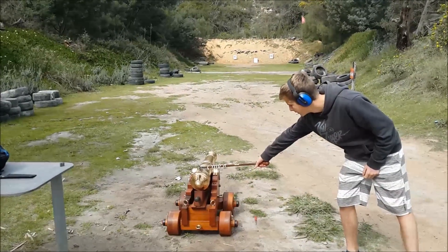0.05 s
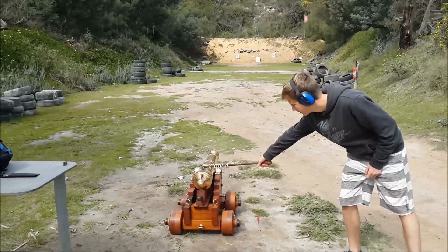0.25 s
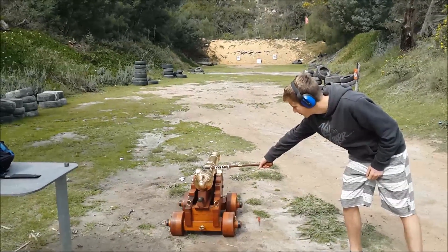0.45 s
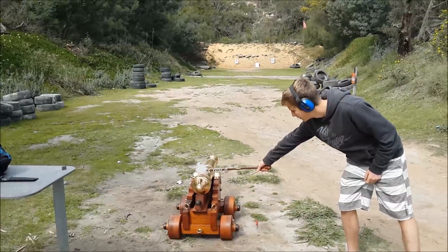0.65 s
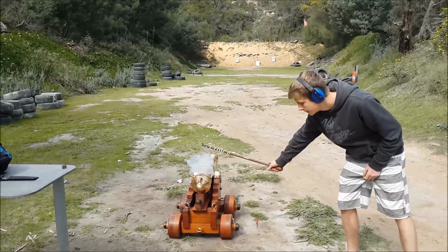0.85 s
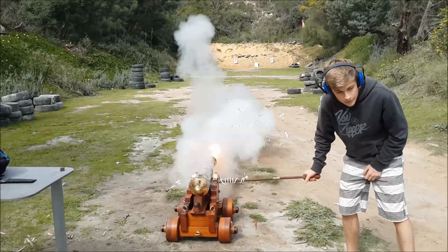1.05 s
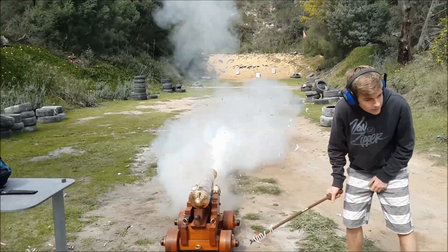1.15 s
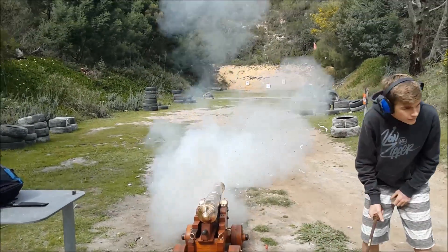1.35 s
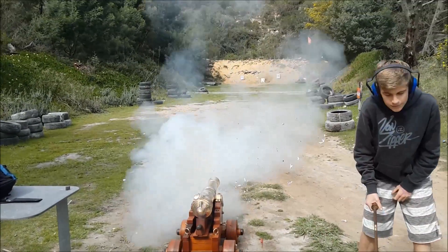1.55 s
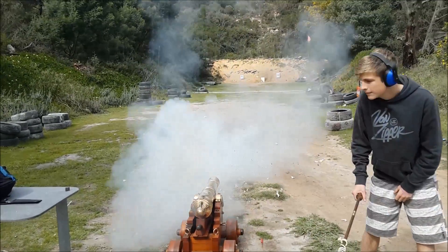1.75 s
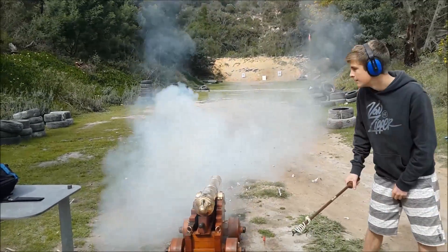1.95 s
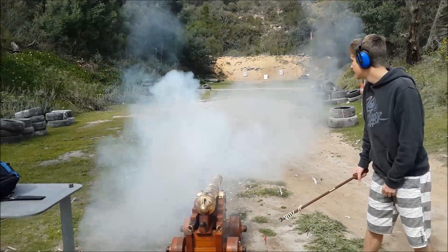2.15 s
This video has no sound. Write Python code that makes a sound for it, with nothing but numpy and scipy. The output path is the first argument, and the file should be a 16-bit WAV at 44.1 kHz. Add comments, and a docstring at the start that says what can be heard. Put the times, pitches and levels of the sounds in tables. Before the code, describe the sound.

A small cannon fires one sharp, overloading blast after a brief fuse hiss, echoing outdoors.

```python
"""Light wind and a faint, distant drone come first. Then a small black powder cannon fires on an
outdoor range: the priming powder fizzes, gas jets from the touch hole (the small hole that leads
to the charge), and the charge goes off with a crack and a roar that overload the microphone.
Earth banks and trees roll the sound back until it passes the far end of the range.
A few bits of debris tick down."""
import sys
import numpy as np
from scipy import signal
from scipy.fft import rfft, irfft, next_fast_len
from scipy.io import wavfile
from scipy.ndimage import map_coordinates

SR = 44100
rng = np.random.default_rng(int(sys.argv[2]) if len(sys.argv) > 2 else 0)


def wav_record(signal):
    """Record a signal, one row per channel, as 16-bit PCM in the file named by sys.argv[1]."""
    frames = np.transpose(np.atleast_2d(signal))
    bounded = np.clip(frames, -1, 1)
    # unit amplitude maps onto the largest positive 16-bit level
    quanta = np.round(bounded * 32767).astype(np.int16)
    wavfile.write(sys.argv[1], SR, quanta)


N = 96182

FIRE_S, BLAST_RISE_S = 1.2452, 0.0013  # when the charge fires, and how long the blast takes to rise

# The tone of each noise, from bass to treble (frequency [Hz], relative level [dB])
BLAST_TONE = [(30, -27), (100, -1), (300, -0.5), (1300, 2.5), (2000, 1), (2900, -1.5), (4500, 0.5),
              (6000, 0), (9000, -4.5), (14000, -8)]  # roar from the muzzle
CRACK_TONE = [(100, -19), (1000, -9.5), (2800, -10), (4300, 2), (6200, -0.5), (8000, -12.5), (14000, -18.5)]  # shock front
SLAP_TONE = [(60, -13), (200, 2), (600, 7), (1500, -5.5), (3000, -20.5), (12000, -38)]  # hard echo off one bank
FIZZ_TONE = [(300, -7), (900, -11), (1700, 0), (3100, -9), (4300, -1), (6000, 0.5), (8000, -7),
             (10000, -14), (13500, -10)]  # burning priming powder
FLARE_TONE = [(300, -7.5), (900, 2), (1700, 10.5), (2900, -5.5), (5000, -6.5), (8000, 2), (9500, -4.5),
              (14000, -5.5)]  # its brighter flare
JET_TONE = [(30, -11.5), (70, -9), (230, -14.5), (460, -14), (750, -5), (1500, -4), (3100, -6.5),
            (4300, -1.5), (6000, 0.5), (9000, -9), (14000, -10)]  # gas from the touch hole
NEAR_ECHO_TONE = [(30, -34.5), (60, -24.5), (90, -10), (125, 0), (185, -0.5), (240, -7), (310, -2.5),
                  (400, -9.5), (520, -5), (800, -17), (1400, -20.5), (3000, -47), (9000, -62.5)]  # near banks
FAR_ECHO_TONE = [(30, -34), (55, -22), (85, -2.5), (130, 3), (165, -4.5), (200, 1), (245, -7.5),
                 (290, -2.5), (350, -9), (420, -2), (580, -6.5), (700, -10.5), (1300, -10), (2400, -21.5),
                 (4000, -30), (10000, -66)]  # far banks
SCATTER_TONE = [(30, -30.5), (80, 2), (200, 6.5), (500, -5.5), (1300, 0.5), (2900, -4.5), (4300, -1.5),
                (5200, -2), (5950, 2.5), (6700, -2), (8000, -6.5), (10000, -13), (14000, -60)]  # echoes from scrub and trees
AIR_TONE = [(15, -59), (25, -36), (54, -3), (111, -2.5), (134, -9), (228, -6.5), (297, -14), (443, -8.5),
            (480, -18.5), (520, -11), (735, -15), (1250, -14), (3730, -27), (6880, -23.5), (14500, -41)]  # light wind
PUFF_TONE = [(30, -18), (70, 2.5), (115, 3.5), (190, -7), (320, -27), (1000, -48)]  # puffs of wind

# How long the blast takes to fade by 60 dB (frequency [Hz], time [s])
BLAST_FADE = [(100, 0.53), (1000, 0.58), (3000, 0.47), (6000, 0.68), (10500, 0.49), (14000, .24)]

# How alike the two sides sound (frequency [Hz], likeness [1 = the same, 0 = unrelated])
CLOSE_LIKENESS = [(60, 0.41), (250, 0.47), (700, 0.43), (1500, 0.058), (14000, 0)]  # the cannon itself
ECHO_LIKENESS = [(60, 0.95), (130, 0.99), (300, 0.98), (640, 0.98), (1200, -0.014), (3000, -0.012),
                 (14000, -0.077)]  # echoes and puffs of wind
AIR_LIKENESS = [(60, 0.69), (240, 0.95), (940, 0.11), (3730, 0.0), (14800, 0.02)]  # light wind

# How far a sound leans to the left (frequency [Hz], left minus right [dB])
BLAST_BALANCE = [(100, 6), (2300, 0), (4400, 2.5), (8000, 4.5), (14000, -2)]
SCATTER_BALANCE = [(400, -3.5), (1300, 6), (2400, -1), (4400, 2), (8000, 4)]
MIC_BALANCE = [(100, 1), (700, -.5), (1300, 0.5), (2400, 1.5), (4350, 0.5), (5800, 6.5), (7600, -12.5),
               (10000, -6.5), (14000, -4.5)]  # the microphone's two openings

# Echoes from the earth banks (time [s], level [dB], rise [s], fall [s])
BANK_ECHOES = [(1.28, -11, 0.0036, 0.012), (1.333, -7.5, 0.022, 0.021), (1.361, -15.5, .004, 0.023),
               (1.447, -16.5, 0.009, 0.013), (1.493, -22, 0.024, 0.016), (1.55, -22.5, 0.017, 0.048),
               (1.639, -24, 0.0116, 0.068), (1.734, -34, 0.023, 0.048), (1.815, -30, 0.038, 0.11),
               (1.938, -40.5, 0.012, 0.01)]
# Bits of debris landing (time [s], level [dB], pitch [Hz], time to fade by 60 dB [s])
DEBRIS_TICKS = [(1.5429, -25.5, 2600, 0.029), (1.8306, -25, 6100, 0.019), (1.8401, -29.5, 6560, 0.014),
                (2.0428, -50, 2350, 0.032)]
# Soft puffs of wind (time [s], level [dB], half length [s])
WIND_PUFFS = [(0.36, -53, 0.0095), (0.675, -46, 0.017), (.765, -50, 0.0099), (0.947, -49, 0.015),
              (0.985, -40.5, 0.007)]
# How loud the background is as time passes (time [s], level [dB])
AIR_LOUDNESS = [(0, -53), (.2, -53.5), (.35, -54), (.52, -55.5), (.65, -53.5), (1.1, -52), (2.18, -58)]
DRONE_LOUDNESS = [(0, -73), (.15, -58), (.3, -81), (.55, -66.5), (.75, -58), (.98, -68), (1.15, -58.5),
                  (2.18, -78.5)]


def blast(level_db=-1.5, hold_s=0.016, ragged_db=2.0):
    """The muzzle blast starts at once, holds briefly, and each frequency dies at its own speed."""
    roar = filtered(noise(BLAST_TONE, CLOSE_LIKENESS), lambda hz: pan(along(BLAST_BALANCE, hz)))
    hz, times, spectrum = signal.stft(roar, SR, nperseg=512)
    age = np.maximum(times - FIRE_S - hold_s, 0)
    fade = np.exp(-np.log(1000) * age / along(BLAST_FADE, hz)[:, None])
    roar = signal.istft(spectrum * fade, SR)[1][:, :N]
    onset = np.clip((clock() - FIRE_S) / BLAST_RISE_S + .5, 0, 1)
    return roar * onset * amp(level_db + ragged_db * wobble(250))


def shock(crack_db=3, slap_db=-9, slap_s=1.3585):
    """The bright crack at the front of the blast, and its duller slap off a near bank."""
    crack = amp(crack_db) * swell(FIRE_S + BLAST_RISE_S, rise_s=0.00028, fall_s=0.0093)
    slap = amp(slap_db) * swell(slap_s, rise_s=0.00066, fall_s=0.003)
    return crack * noise(CRACK_TONE, CLOSE_LIKENESS) + slap * noise(SLAP_TONE, ECHO_LIKENESS)


def priming(start_s=0.697, fade_db_per_s=14, full_jet_s=1.2368, jet_db_per_s=713.5, sputter_db=0.2):
    """Powder in the touch hole catches, fizzes and flares, then jets harder until the charge fires."""
    t = clock()
    age = t - start_s
    burn = np.clip(age / .13, 0, 1) * amp(-53 - fade_db_per_s * age)
    catch = amp(-58) * swell(peak_s=0.758, rise_s=0.045, fall_s=.04)
    flare = amp(-55) * swell(peak_s=0.99, rise_s=0.18, fall_s=0.14)
    jet = amp(-15 + jet_db_per_s * np.minimum(t - full_jet_s, 0))
    gas = (burn + catch) * noise(FIZZ_TONE, CLOSE_LIKENESS)
    gas += flare * noise(FLARE_TONE, CLOSE_LIKENESS)
    gas += jet * noise(JET_TONE, CLOSE_LIKENESS)
    return gas * amp(sputter_db * wobble(300)) * (t < FIRE_S + BLAST_RISE_S)


def ground_bounce(sound, count=8, latest_s=.009, strength=0.15):
    """The ground and the cannon's carriage add weak, quick copies, different at each ear."""
    delays = latest_s * rng.uniform(0.1005, 1, (count, 2, 1))
    copies = lambda hz: 1 + strength * np.exp(-2j * np.pi * hz * delays).sum(0)
    return filtered(sound, copies) / np.sqrt(1 + count * strength ** 2)


def bank_echoes(near_count=3):
    """The near banks answer first with a boom, the far ones later with a rolling rumble."""
    swells = np.array([amp(db) * swell(s, rise, fall) for s, db, rise, fall in BANK_ECHOES])
    boom = swells[:near_count].sum(0) * noise(NEAR_ECHO_TONE, ECHO_LIKENESS)
    rumble = swells[near_count:].sum(0) * noise(FAR_ECHO_TONE, ECHO_LIKENESS)
    return boom + rumble


def tree_scatter(fade_db_per_s=25, far_end_s=1.905, extra_fade_db_per_s=59.5, build_s=.2, grain_db=1.0):
    """Countless tiny echoes from scrub and trees, fading faster once the far end has answered."""
    t = clock()
    level_db = -20 - fade_db_per_s * (t - FIRE_S) - extra_fade_db_per_s * np.maximum(t - far_end_s, 0)
    leaves = filtered(noise(SCATTER_TONE, ECHO_LIKENESS), lambda hz: pan(along(SCATTER_BALANCE, hz)))
    hz, times, spectrum = signal.stft(leaves, SR, nperseg=512)
    # Later echoes have crossed more air, so they are duller: 8 dB a second at 7000 Hz.
    loss_db = 8 * np.maximum(times - FIRE_S, 0) * (hz[:, None] / 7000) ** 2
    leaves = signal.istft(spectrum * amp(-loss_db), SR)[1][:, :N]
    onset = np.clip((t - FIRE_S) / build_s, 0, 1)
    return leaves * onset * amp(level_db + grain_db * wobble(220))


def debris(sharpness=2, left_db=3):
    """Falling bits land with short, dry ticks, each a broad band of noise around one pitch."""
    ticks = np.zeros((2, N))
    for time_s, db, pitch, fade_s in DEBRIS_TICKS:
        band = lambda hz: (1 + (2 * sharpness * (hz / pitch - 1)) ** 2) ** -2
        tick = unit_level(filtered(rng.standard_normal((2, N)), band))
        ticks += tick * amp(db) * swell(time_s, rise_s=0.00032, fall_s=fade_s / np.log(1000))
    return ticks * pan(left_db)


def wind():
    """Moving air makes a quiet rush with a few soft, low puffs."""
    air = loudness(AIR_LOUDNESS) * noise(AIR_TONE, AIR_LIKENESS)
    puffs = sum(amp(db) * np.exp(-((clock() - s) / half) ** 2) for s, db, half in WIND_PUFFS)
    return air + puffs * noise(PUFF_TONE, ECHO_LIKENESS)


def drone(pitch_hz=439, waver_rad=0.95):
    """A faint, distant tone that wavers in pitch as it comes and goes."""
    phase = 2 * np.pi * pitch_hz * clock() + waver_rad * wobble(17)
    return loudness(DRONE_LOUDNESS) * unit_level(np.sin(phase))


def noise(tone, likeness):
    """Stereo noise of average strength 1, with a given tone and likeness between the sides."""
    def shape(hz):
        width = np.arccos(np.clip(along(likeness, hz), -1, 1)) / 2
        return amp(along(tone, hz)) * [np.cos(width), np.sin(width)]
    mid, side = filtered(rng.standard_normal((2, N)), shape)
    return unit_level(np.array([mid + side, mid - side]))


def swell(peak_s, rise_s, fall_s):
    """A rounded rise to a peak, then a fall to about a third every fall_s."""
    age = clock() - peak_s
    return np.exp(-(np.minimum(age, 0) / rise_s) ** 2 - np.maximum(age, 0) / fall_s)


def wobble(rate):
    """A smooth curve through `rate` random points a second."""
    return map_coordinates(rng.standard_normal(int(N * rate / SR) + 4), [clock() * rate])


def filtered(sound, gain):
    """Multiply each frequency in a sound by gain(hz)."""
    size = next_fast_len(N + SR // 2)
    return irfft(rfft(sound, size) * gain(np.fft.rfftfreq(size, 1 / SR)), size)[..., :N]


def along(table, hz):
    """Read between the rows of a frequency table, giving each octave about equal room."""
    frequencies, values = np.transpose(table)
    return np.interp(np.log(hz + 1), np.log(frequencies + 1), values)


def loudness(table):
    """The gain at each sample, from a table of times and levels."""
    return amp(np.interp(clock(), *np.transpose(table)))


def pan(db):
    """Two gains that make the left side db louder than the right."""
    return amp(np.array([[.5], [-.5]]) * db)


def amp(db):
    """Turn decibels into a gain, a number to multiply a sound by."""
    return 10 ** (np.asarray(db) / 20)


def unit_level(sound):
    """Scale a sound to an average strength (rms) of 1."""
    return sound / np.sqrt(np.mean(sound ** 2) + 1e-20)


def clock():
    """The time of each sample in seconds."""
    return np.arange(N) / SR


def scene():
    """The shot, its echoes and falling debris, over the wind and the drone."""
    shot = priming() + ground_bounce(blast() + shock() + tree_scatter())
    return shot + bank_echoes() + debris() + wind() + drone()


def record(dry, hardness=10, top_hz=14700):
    """Each side of the microphone has its own tone and overloads on the blast; the top treble is cut."""
    heard = filtered(dry, lambda hz: pan(along(MIC_BALANCE, hz)))
    clipped = heard / (1 + np.abs(heard) ** hardness) ** (1 / hardness)
    return filtered(clipped, lambda hz: 1 / (1 + (hz / top_hz) ** 90))


dry = scene()
out = record(dry)
wav_record(out)
```